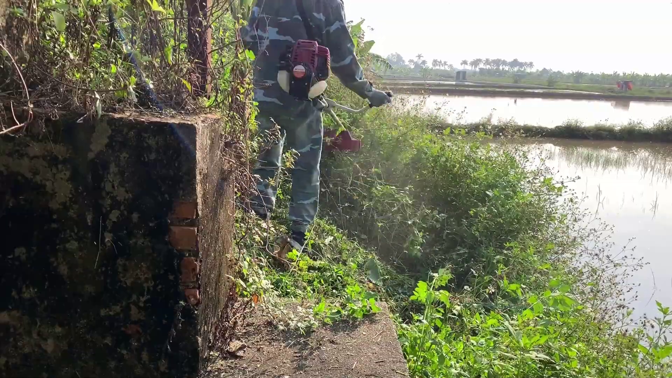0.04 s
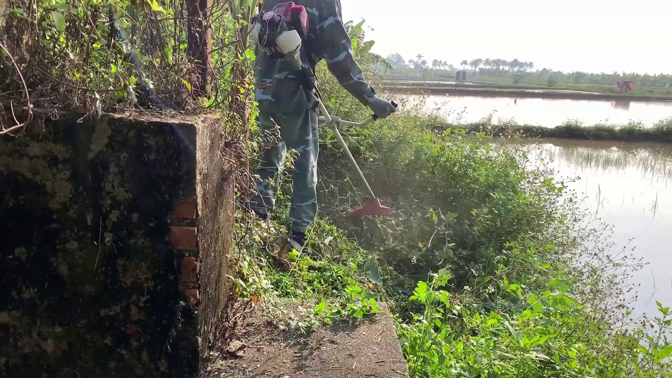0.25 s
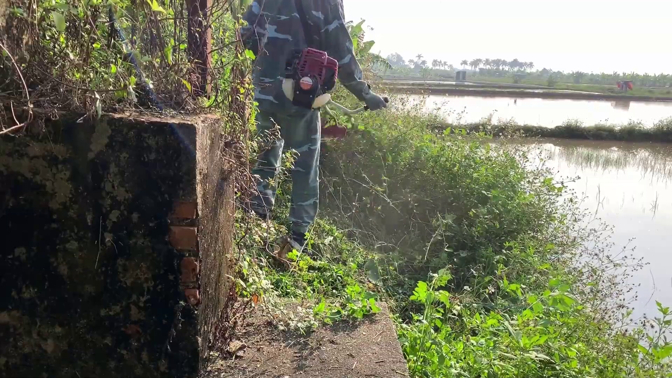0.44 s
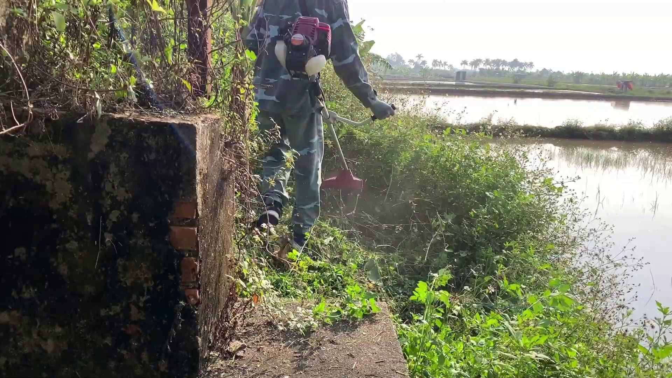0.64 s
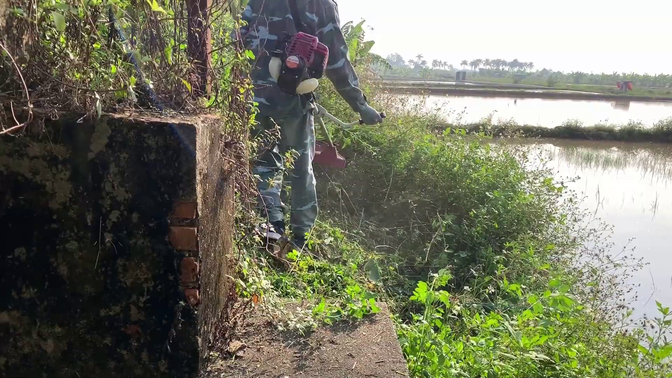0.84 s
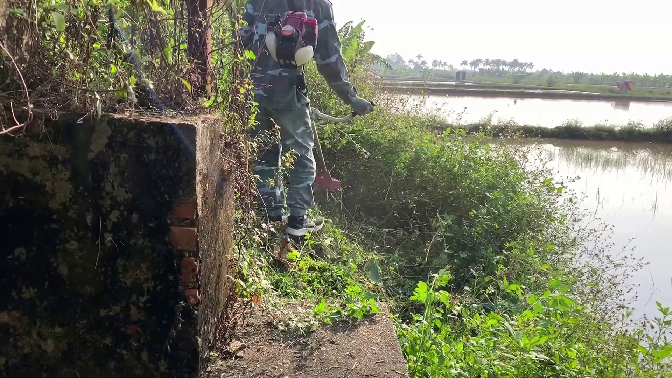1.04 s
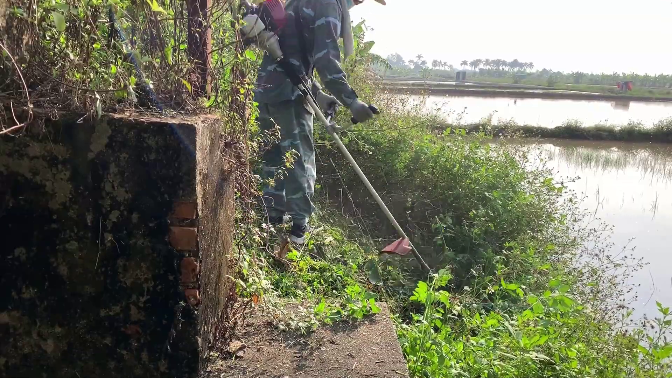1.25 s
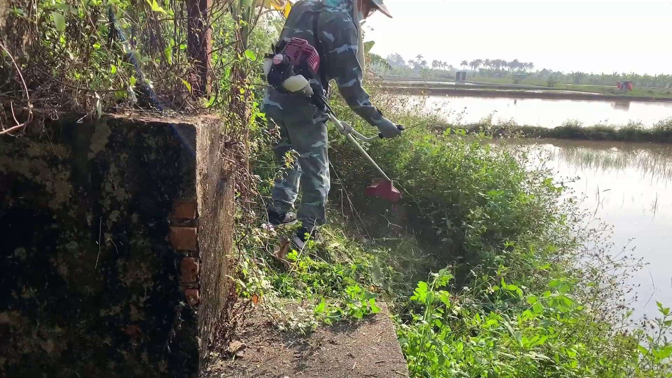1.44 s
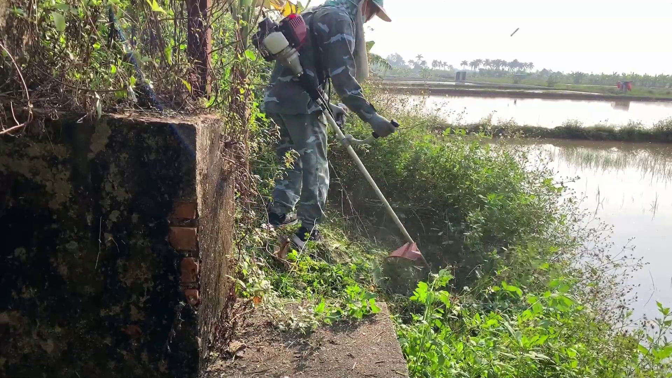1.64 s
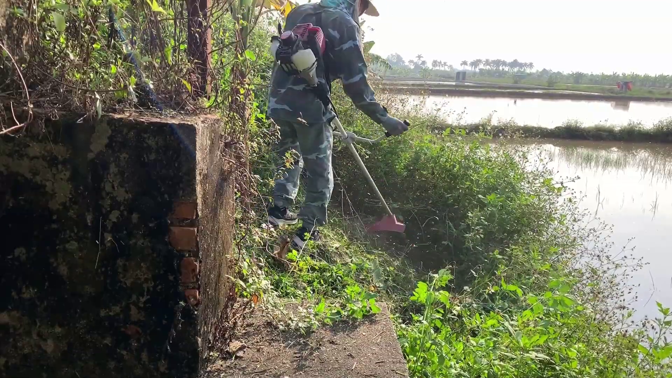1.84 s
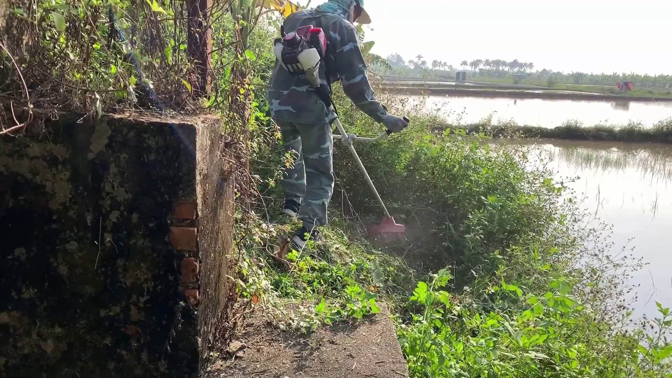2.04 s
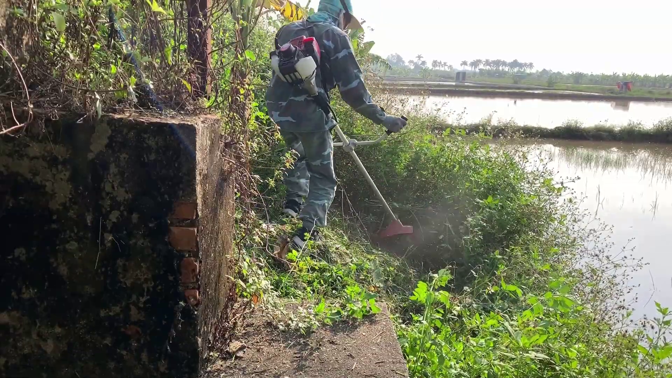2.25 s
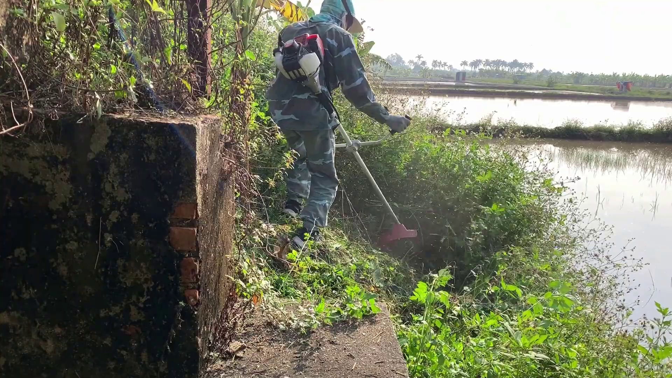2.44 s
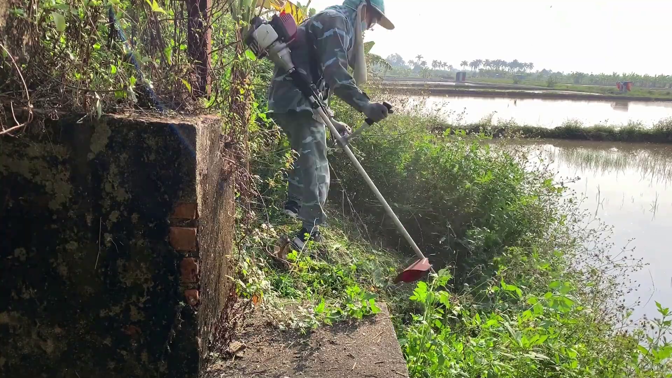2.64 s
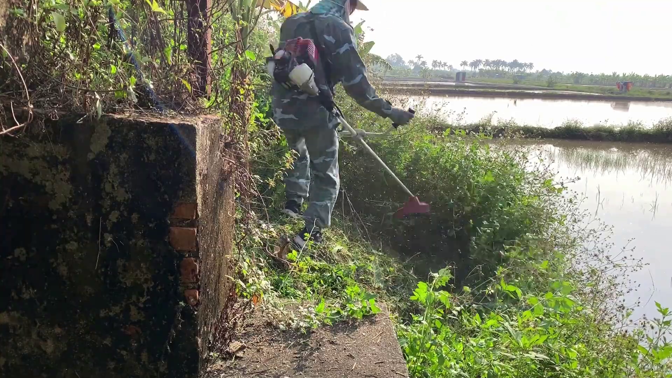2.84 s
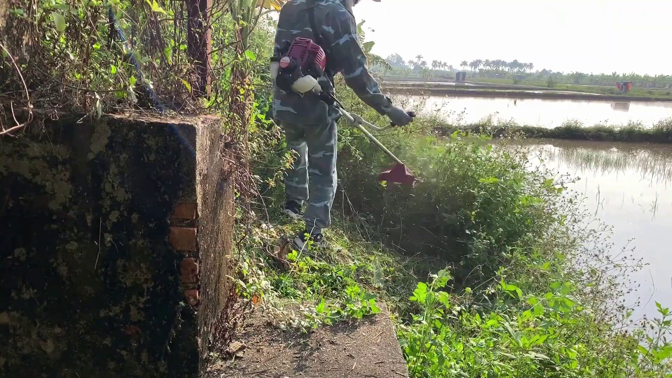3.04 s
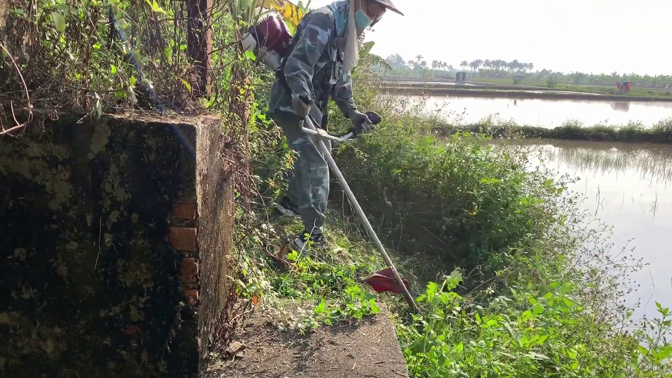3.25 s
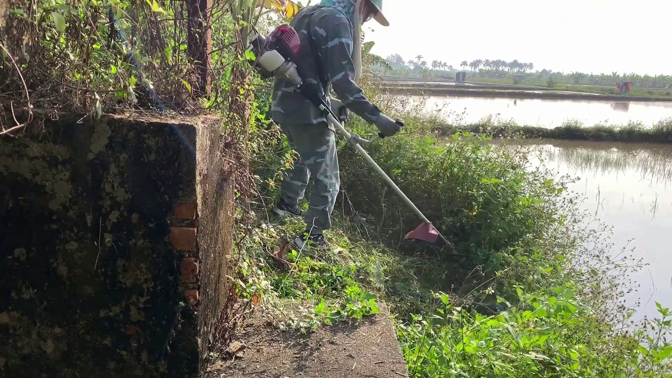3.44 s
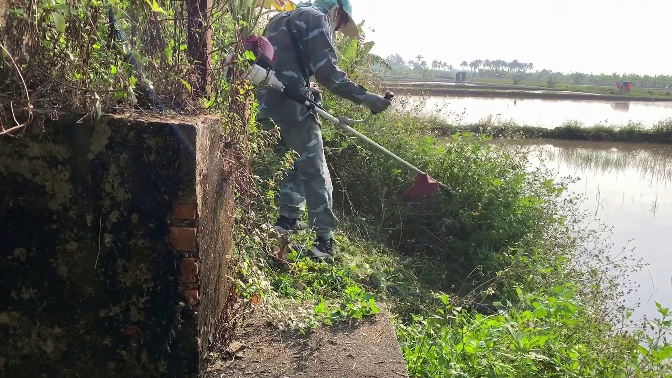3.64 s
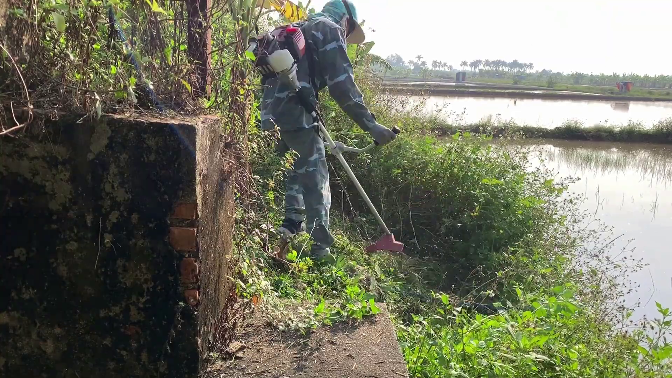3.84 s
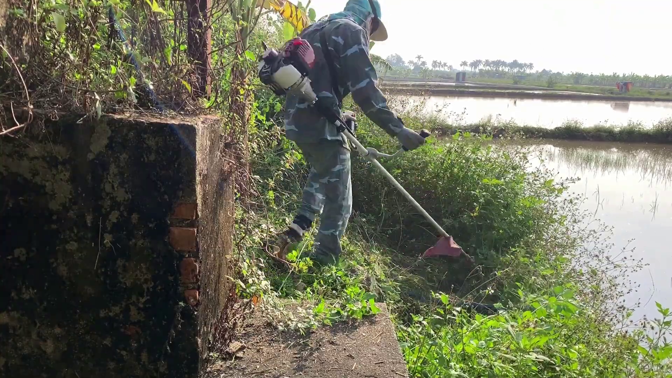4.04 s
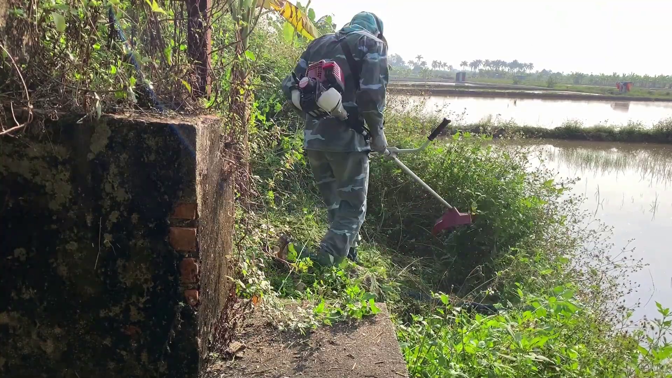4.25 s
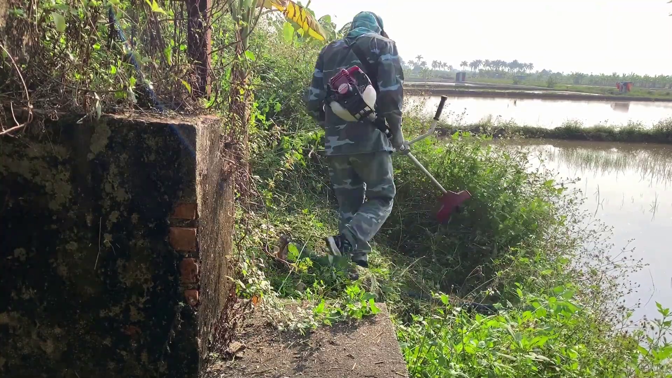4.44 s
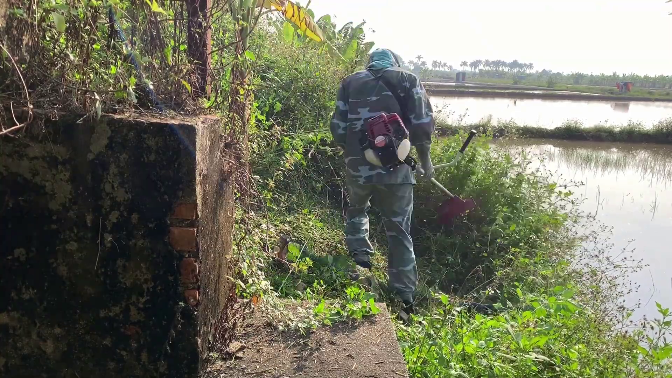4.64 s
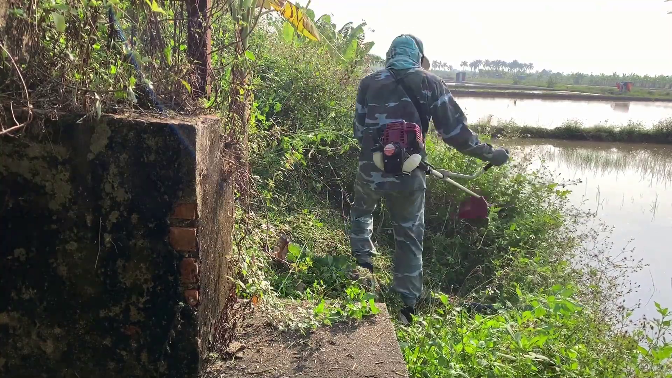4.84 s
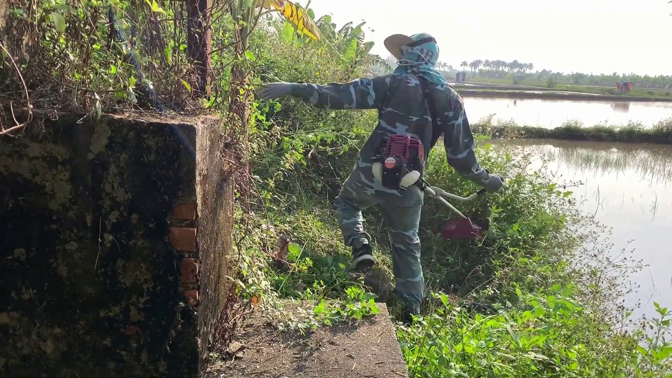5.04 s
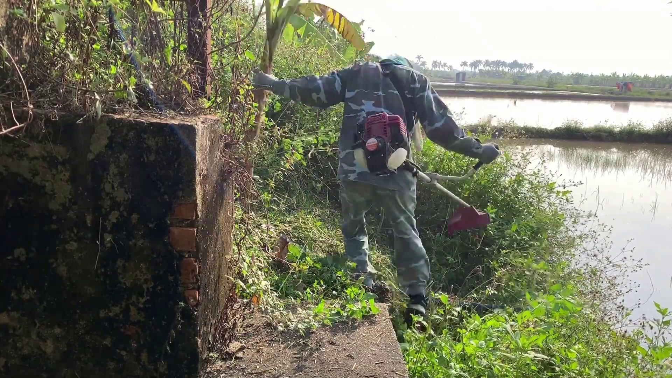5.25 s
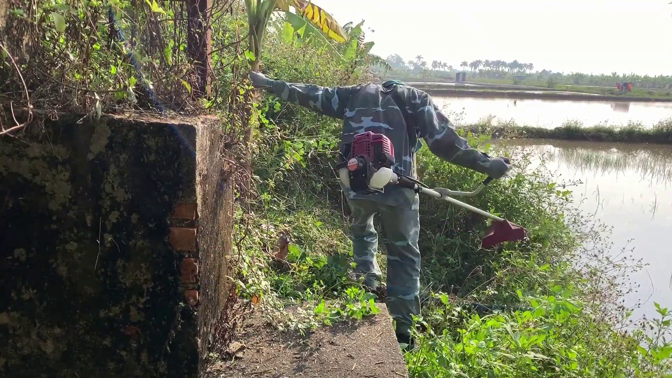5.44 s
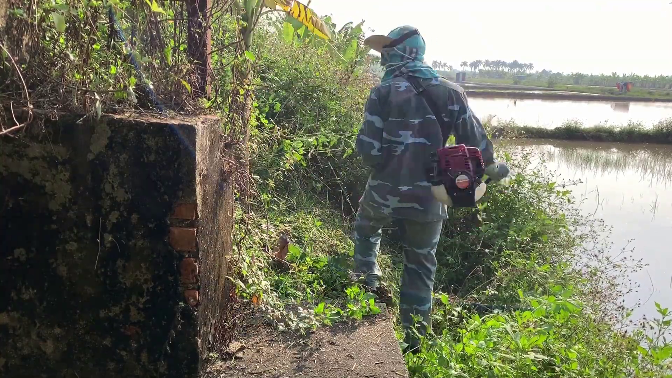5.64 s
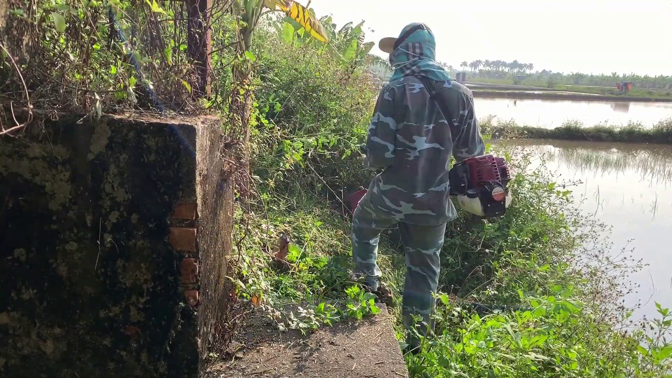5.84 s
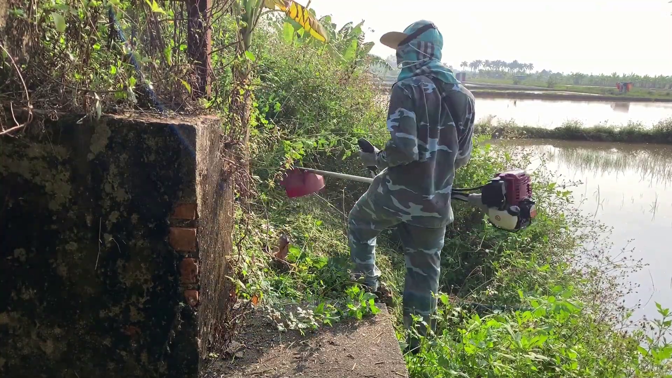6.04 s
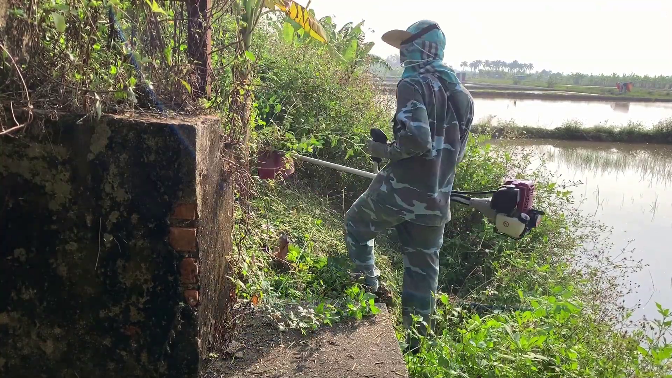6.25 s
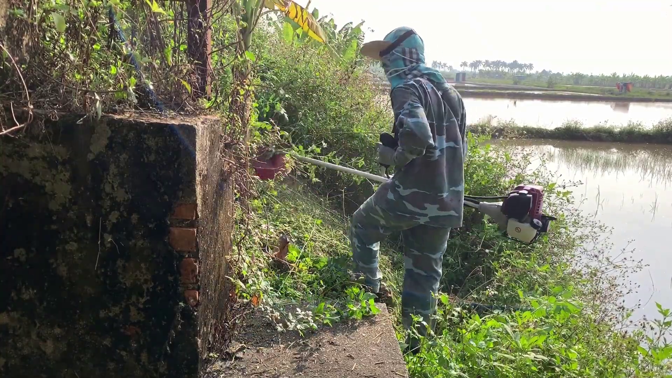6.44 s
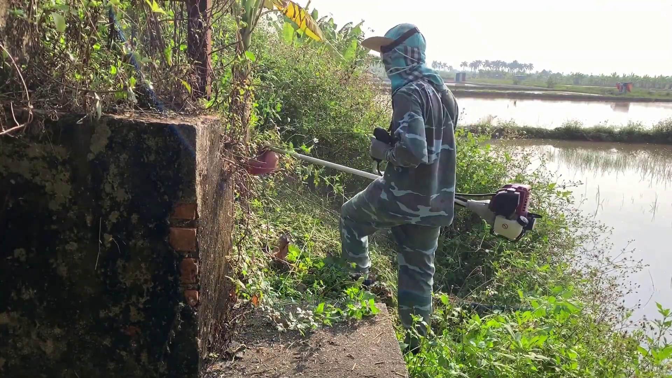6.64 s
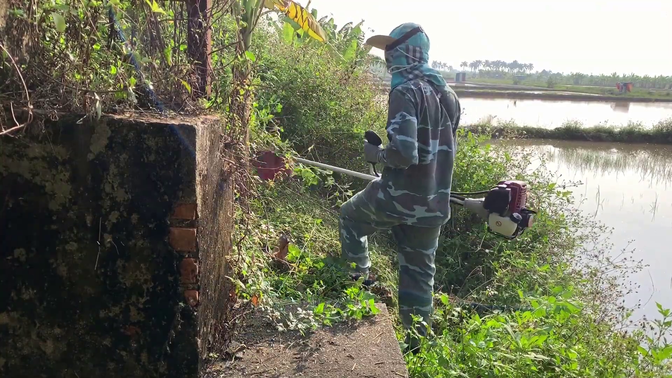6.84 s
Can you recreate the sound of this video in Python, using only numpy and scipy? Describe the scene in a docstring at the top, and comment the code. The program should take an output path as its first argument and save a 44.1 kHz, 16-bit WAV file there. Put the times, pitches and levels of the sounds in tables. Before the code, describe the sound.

In the open beside a weedy bank, a small two-stroke brush cutter is heard in stereo from a few metres away. From 0 to 4 seconds it runs at high revs, a dense, ringing buzz sagging in pitch and recovering as the head bites, especially near 0.2, 1.5, 2.5 and 3.0. Airy hiss, shredded leaves and crackling stems ride over it, with gear whine and chatter around 2.1 to 2.3 and 3.5. At about 4.1 the throttle shuts and the note falls quickly to a quieter, lower, uneven sputter, with small dry pops around 5.05 to 5.45. At 5.75 it opens abruptly, louder and closer, with a brief high rising squeak near 5.9 and gear chatter around 6.0. It climbs back to full revs and cuts on, sagging sharply near 6.6, until the end at about 6.9. Faint breeze buffets the microphones.

```python
"""A two-stroke backpack brush cutter works through weeds on a bank, a few metres away in the open.
Its exhaust is one ringing pulse per firing; the engine sags as the head bites, drops back, then opens up close by.
Each firing also puffs hiss; ragged ones ring the muffler or pop. Stems crackle in the rush of air and leaves.
The gear in the head whines in bursts and chatters, the head squeaks once, and a faint breeze buffets."""
import sys
import numpy as np
from scipy import signal
from scipy.fft import rfft, irfft, next_fast_len
from scipy.io import wavfile
from scipy.ndimage import uniform_filter1d

SR = 44100
rng = np.random.default_rng(int(sys.argv[2]) if len(sys.argv) > 2 else 0)


def digitize_waveform(pressure):
    """Quantize a signal to 16-bit integers and store it at the path in sys.argv[1].

    Rows of a 2-D input are taken as channels; values are limited to [-1, 1].
    """
    field = np.atleast_2d(pressure).T
    bounded = np.clip(field, -1, 1)
    quanta = np.round(bounded * 32767).astype(np.int16)
    wavfile.write(sys.argv[1], SR, quanta)


N = 304731
T = np.arange(N) / SR
FFT_SIZE = next_fast_len(N)
HZ = np.fft.rfftfreq(FFT_SIZE, 1 / SR)
CUTOFF_HZ = 15900
SHUT_S, OPEN_S = 4.1, 5.75  # the throttle is shut between these times

# Stereo width. Each row: frequency in Hz, side minus mid in dB.
WIDTH = [(60, -18), (300, -12), (700, -31), (1300, -7.5), (2400, -21.5), (4400, -7.5), (8100, -6),
         (15000, -5)]


def amp(db):
    """Decibels to gain."""
    return 10 ** (np.asarray(db) / 20)


def unit(x):
    """Scales to an rms of one."""
    return x / np.sqrt(np.mean(abs(x) ** 2) + 1e-20)


def follow(rows, t=T):
    """The columns of a curve table at the times t."""
    s, *columns = np.transpose(rows)
    return [np.interp(t, np.sort(s), column) for column in columns]


def read(points, hz):
    """A spectrum at the given frequencies, interpolated over log frequency."""
    f, value = np.transpose(points)
    return np.interp(np.log(hz + 1), np.log(f + 1), value)


def colour(x, gain):
    """Filters by one gain per frequency."""
    return irfft(rfft(x, FFT_SIZE) * gain, FFT_SIZE)[..., :N]


def drift(rate_hz):
    """Smooth chance of unit rms, rolled off around the rate."""
    return unit(colour(rng.standard_normal(N), np.exp(-(HZ / rate_hz) ** 2)))


def wander(z, firings):
    """Smooths chance values over about so many firings."""
    lag = np.arange(-200, 201)[:, None]
    return unit(signal.fftconvolve(z, np.exp(-(lag / firings) ** 2), "same", axes=0))


def widen(mid, side):
    """Left and right from direct sound and sound scattered by the surroundings."""
    side = colour(side, amp(read(WIDTH, HZ)))
    return np.array([mid + side, mid - side])


def running(t, changes, fade=0.037):
    """Shares of the stretches between the changes, fading into one another over so many seconds."""
    passed = [np.clip((t - s) / fade + .5, 0, 1) for s in changes]
    return -np.diff([np.ones(len(t)), *passed, np.zeros(len(t))], axis=0)


def swell(t, s, before, after, shape=2):
    """Rises to one at the time s and falls away again."""
    return np.exp(-(abs(t - s) / np.where(t < s, before, after)) ** shape)


def bursts(rows):
    """The envelope of rows of time in s, half length in s, level in dB."""
    return sum(amp(db) * swell(T, s, half, half) for s, half, db in rows)


def lift_db(rows):
    """The brief level changes in rows of time in s, half length in s, change in dB."""
    return sum(db * swell(T, s, half, half) for s, half, db in rows)


def coasting(t):
    """One while the throttle is shut."""
    return running(t, [SHUT_S, OPEN_S], fade=.021)[1]


def sag(t):
    """Speed lost as the head bites into weeds, in firings per second."""
    # Each row: time when slowest in s, sag in Hz, build-up in s, recovery in s.
    bites = [(0.032, 28.7, 0.14, 0.05), (0.198, 32.5, 0.052, 0.22), (0.359, 9.9, 0.13, 0.14),
             (0.632, 16.4, 0.028, 0.074), (0.787, 24.8, 0.062, 0.1), (1.315, 19.2, 0.21, 0.11),
             (1.473, 35, 0.059, 0.088), (1.64, 17.5, 0.072, 0.084), (1.765, 22.3, 0.063, 0.071),
             (1.962, 16.3, 0.15, 0.074), (2.106, 16.7, 0.06, 0.29), (2.538, 34.5, 0.34, 0.26),
             (2.729, 12, 0.112, 0.037), (2.892, 27, 0.11, 0.044), (2.984, 43.5, 0.053, 0.094),
             (3.353, 20.6, 0.14, 0.28), (3.94, 27.1, 0.11, 0.45), (6.198, 9.7, 0.14, 0.054),
             (6.627, 48.8, 0.059, 0.11)]
    shape = 1.5  # between pointed (1) and rounded (2)
    return sum(hz * swell(t, s, build, recovery, shape) for s, hz, build, recovery in bites)


def crank_speed(t):
    """Firings per second: what the throttle gives less what the weeds take."""
    # Head running free. Each row: time in s, firings per second.
    free_speed = [(-0.0, 347.6), (4.042, 350.8), (4.11, 289.5), (4.217, 236.8), (4.425, 200.6),
                  (4.659, 191.7), (4.77, 207.7), (5.08, 208.3), (5.1, 205.3), (5.23, 205.1), (5.286, 209.5),
                  (5.37, 203), (5.424, 209), (5.468, 202.7), (5.586, 206.6), (5.738, 204.8), (5.76, 273.4),
                  (5.925, 279.0), (6.022, 333.6), (6.359, 354.8), (6.7, 349.7), (6.9, 362.4)]
    return follow(free_speed, t)[0] - sag(t)


def breeze(level_db=-1, corner_hz=45, buffet_db=4, buffet_hz=8):
    """Wind on the microphone: faint low noise, buffeting at random, with a few gusts."""
    # Steady breeze. Each row: time in s, level in dB before the trim level_db.
    steady_levels = [(0, -99), (1.4, -103), (3.9, -106), (4.2, -119), (5.6, -110), (5.85, -94), (6.1, -101),
                     (6.91, -103)]
    # Each row: time in s, half length in s, level in dB.
    gusts = [(.52, 0.03, -88), (.87, 0.029, -89), (1.285, 0.013, -82), (5.8, 0.039, -91),
             (5.965, 0.026, -81), (6.39, 0.024, -91)]
    rumble = unit(colour(rng.standard_normal((2, N)), 1 / (1 + (HZ / corner_hz) ** 2)))
    steady = amp(follow(steady_levels)[0] + level_db + buffet_db * drift(buffet_hz))
    return widen(*rumble) * (steady + bursts(gusts))


def surroundings(x, fade_s=0.037):
    """Reflections from wall, bank and body cancel or lift narrow bands for a while."""
    # Each row: start in s, end in s, centre in Hz, width in Hz, gain in dB.
    reflections = [(0.181, 0.36, 1940, 350.5, -18), (0.448, 0.619, 3900, 700, -9),
                   (1.3, 2.1, 3650, 349.7, -5), (2.25, 2.95, 1970, 299.4, -3),
                   (3.101, 3.851, 1170, 160, -2), (3.265, 3.5, 3940, 900, 2.5),
                   (4.126, 4.68, 1170, 200, 4.5), (4.2, 4.68, 3670, 600, -5), (4.7, 5.727, 5400, 500, -8),
                   (4.7, 5.721, 3429, 200, -13), (5.33, 5.68, 10900, 350, 4),
                   (6.1, 6.951, 6520, 499.6, -15), (6.098, 6.95, 3220, 350, -8),
                   (6.569, 6.715, 3434, 998, -2)]
    for start, end, hz, width, db in reflections:
        band = signal.lfilter(*signal.iirpeak(hz, hz / width, fs=SR), x)
        x = x + (amp(db) - 1) * running(T, [start, end], fade=fade_s)[1] * band
    return x


def squeak(turns, level_db=-2, undertone_db=-9):
    """The head scrapes: a short rising squeak with a rasp an octave below, shaken once a turn."""
    # Each row: time in s, pitch in Hz, level in dB before the trim level_db.
    glide = [(5.862, 9580, -40), (5.869, 9860, -28), (5.877, 11000, -30), (5.882, 12270, -29),
             (5.889, 11940, -28), (5.898, 12790, -42)]
    hz, db = follow(glide)
    sounding = (T > glide[0][0]) & (T < glide[-1][0])
    phase = 2 * np.pi * np.cumsum(hz) / SR + 0.87 * drift(590)
    tone = np.sin(phase) + amp(undertone_db) * np.sin(phase / 2 + drift(694))
    return sounding * amp(db + level_db) * tone * (1 + 1.16 * np.cos(2 * np.pi * turns))


def grab():
    """How hard the weeds are braking the head, from -1 (spinning up) to 1."""
    smoothing_s, hard_braking_hz_per_s = 0.02, 390
    braking = uniform_filter1d(np.gradient(sag(T), T), int(smoothing_s * SR))
    return np.tanh(braking / hard_braking_hz_per_s)


def gear(turns, bursts_hz=88, unevenness=0.41, burst_s=0.0025, spread_db=1.5, level_db=1.0,
         chatter_db=-3, runout_depth=0.088, lobes_depth=0.37, unload_s=0.052, wobble=1.8,
         grab_db=5.5, coasting_db=-17.5):
    """Teeth mesh at thirty times crank speed; the shaft winds up and lets go, so the whine comes in bursts."""
    # Whine. Each row: time in s, level in dB before the trim level_db.
    whine_levels = [(0.0, -48), (2.26, -45), (3.85, -51.5), (3.96, -40), (4.18, -41), (5.69, -65.5),
                    (6.02, -41), (6.38, -59), (6.9, -45)]
    # Brief swells and drops. Each row: time in s, half length in s, change in dB.
    swells = [(.22, 0.046, 8.5), (.34, 0.026, 11), (1.28, 0.023, 4.5), (1.37, 0.032, -18), (1.53, 0.14, 4),
              (5.945, .025, 7), (6.17, 0.039, 9)]
    # Hardest bursts. Each row: time in s, peak in dB before the trim chatter_db.
    chatter = [(2.121, -30), (2.142, -31), (2.171, -30.5), (2.2016, -45), (2.248, -30.5), (2.256, -33),
               (2.27, -30), (2.28, -28), (2.2918, -32), (2.3043, -36), (3.4536, -34), (3.4678, -43),
               (3.494, -40), (3.5085, -35), (3.524, -35), (5.961, -27), (5.9836, -29), (6.0253, -27),
               (6.0339, -22), (6.0416, -22), (6.053, -27)]
    shaft = np.cumsum(bursts_hz * (1 + unevenness * drift(70))) / SR
    sizes = amp(spread_db * np.clip(rng.standard_normal(N), -2, 1.5))
    kicks = np.diff(np.floor(shaft), prepend=0) * sizes
    bell = np.exp(-(np.arange(-400, 401) / SR / burst_s) ** 2)
    level = unit(.15 + unit(signal.oaconvolve(kicks, bell, "same")))
    hard = np.zeros(N)
    for s, db in chatter:
        hard[round(s * SR)] = amp(db + chatter_db)
    whine_db = follow(whine_levels)[0] + level_db + grab_db * grab() + lift_db(swells)
    level = np.maximum(level * amp(whine_db), signal.oaconvolve(hard, bell, "same"))
    level = level * amp(coasting_db * coasting(T + unload_s))  # coasting teeth carry little load
    # uneven tooth load, once and three times a turn, puts sidebands around the whine
    load = 1 + runout_depth * np.cos(2 * np.pi * turns) + lobes_depth * np.cos(6 * np.pi * turns)
    load = load + .25 * drift(1100)
    phase = 2 * np.pi * 30 * turns + wobble * drift(97)
    ears = np.array([np.cos(phase + .35 * drift(40)) for ear in range(2)])
    return level * load * np.sqrt(2) * ears


def bounce(x, delay_s=0.000632, sway=0.098, strength=0.28):
    """A close reflection whose path changes with the swing: slowly moving peaks and dips in the treble."""
    late = T - delay_s * (1 + sway * drift(1.62))
    return (x + strength * np.array([np.interp(late, T, ear) for ear in x])) / np.hypot(1, strength)


def hiss(turns, open_puff=0.96, puff_turns=0.33, stray_turns=0.089, crackle=0.41, stems_per_s=900,
         grain_db=1.0, rush_db=0.9, fizz_db=-1.5, spit_turns=0.086, spit_spread_db=0.2):
    """Gas bursts from the port once a turn, over the rush of the head and the snapping of stems."""
    # Air and leaves. Each row: time in s, rush below and fizz above 10 kHz in dB before trims.
    levels = [(0, -49.5, -38.5), (1.38, -52, -44), (2.35, -51.5, -40), (2.7, -55, -46), (3.8, -54, -44.5),
              (3.98, -49, -40.5), (4.13, -52.5, -48.5), (4.7, -54.5, -49.5), (5.74, -46.5, -44.5),
              (5.9, -45, -30.5), (6.2, -50.5, -40.5), (6.9, -51.5, -43.5)]
    # Colour with the throttle open. Each row: frequency in Hz, relative level in dB.
    open_colour = [(100, -45), (190, -37), (270, -17), (520, -15), (850, -25), (1200, -21), (1550, -13),
                   (2000, -29), (2700, -8), (3600, -9.5), (4500, -5.5), (5200, -1.5), (6000, -3.5),
                   (7300, -1.5), (10500, 5), (12500, 3.5), (15700, 2)]
    # Colour with the throttle shut. Each row: frequency in Hz, relative level in dB.
    shut_colour = [(130, -49), (240, -18), (900, -10.5), (2600, -12.5), (3500, -13.5), (4400, -6),
                   (5000, -7.5), (5800, -10), (6150, -4.5), (6500, -6), (7300, -2.5), (7750, -2),
                   (8150, -4), (8800, 0.5), (10200, 0.5), (11100, 4.5), (12000, 4.5), (13000, 7.5),
                   (14300, 2.5), (15300, 5), (15700, 5)]
    # Coasting puffs, growing as the engine picks up again. Each row: time in s, depth.
    spit_depth = [(4.2, 1.55), (4.9, 2.65)]
    # Sprays of shredded leaves. Each row: time in s, half length in s, lift in dB.
    sprays = [(1.021, 0.026, 4.5), (1.549, 0.048, 1), (2.339, 0.036, 3), (3.025, 0.16, 4)]
    shut = coasting(T)
    # turbulence shifts each puff a little
    puff = np.exp(-((turns + stray_turns * drift(200)) % 1) / puff_turns)
    # no two coasting firings spit alike
    sizes = amp(spit_spread_db * np.clip(rng.standard_normal(N), -2, 2))
    spit = sizes[turns.astype(int)] * np.exp(-(turns % 1) / spit_turns)
    snap_sizes = amp(grain_db * np.minimum(rng.exponential(1, (2, N)), 5))
    snaps = (rng.random((2, N)) < stems_per_s / SR) * snap_sizes
    snaps = signal.lfilter([1], [1, -np.exp(-1 / (0.00073 * SR))], snaps)
    air = bounce(rng.standard_normal((2, N)))
    open_gate = 1 + open_puff * puff + crackle * unit(snaps)
    shut_gate = 1 + follow(spit_depth)[0] * spit
    noise = 0
    for share, gate, spectrum in ((1 - shut, open_gate, open_colour), (shut, shut_gate, shut_colour)):
        noise = noise + share * unit(colour(air * gate, amp(read(spectrum, HZ)) * (HZ < CUTOFF_HZ)))
    noise = widen(*noise) * amp(1.36 * drift(18))  # the hiss flickers
    noise = noise * amp(lift_db(sprays))
    high = 1 / (1 + (10000 / (HZ + 1)) ** 8)
    rush, fizz = follow(levels)
    low_part = colour(noise, 1 - high) * amp(rush + rush_db + 11.5)
    return low_part + colour(noise, high) * amp(fizz + fizz_db + 2.0)


def misfires(ring_s=0.0022, low_hz=550, high_hz=3000):
    """A late charge goes off in the muffler: one short, dry pop out of the idle."""
    # Each row: time in s, peak in dB.
    late_firings = [(4.327, -47), (5.055, -31), (5.225, -34), (5.26, -42), (5.45, -33)]
    resonator = signal.butter(4, [low_hz, high_hz], "bandpass", fs=SR, output="sos")
    t = np.arange(1000) / SR
    out = np.zeros(N)
    for s, db in late_firings:
        pop = signal.sosfilt(resonator, rng.standard_normal(len(t)) * np.exp(-t / ring_s))
        out[round(s * SR):][:len(t)] += amp(db) * pop / abs(pop).max()
    return out


def sputter(turns, stray_turns=.17, spread_db=4.0, edge_s=0.017):
    """Half-burnt firings, uneven in size and timing, each ring a resonance of the muffler or of the engine
    casing."""
    # Throttle shutting, idling, opening. Each row: start in s, end in s, resonance in Hz, width in Hz, level in dB.
    resonances = [(4.05, 4.117, 810, 240, -52.5), (4.065, 4.118, 1430, 840, -50.5),
                  (4.055, 4.21, 2430, 550, -55), (4.16, 4.225, 1250, 1000, -56),
                  (4.1, 4.66, 7300, 340, -53.5), (4.75, 5, 4200, 170, -62), (4.8, 6.1, 2700, 990, -58.5),
                  (5.738, 5.775, 1520, 1700, -39), (4.1, 4.1, 5300, 810, -68)]
    fired = np.diff(np.floor(np.maximum.accumulate(turns + stray_turns * drift(120))), prepend=0)
    pops = fired * amp(spread_db * np.clip(rng.standard_normal(N), -2, 2))
    out = 0
    for start, end, hz, width, db in resonances:
        edges = [max(hz - width / 2, hz / 10), hz + width / 2]
        resonator = signal.butter(2, edges, "bandpass", fs=SR, output="sos")
        ring = unit(signal.sosfilt(resonator, pops))
        out = out + amp(db) * running(T, [start, end], fade=edge_s)[1] * ring
    return out


def exhaust_levels(t):
    """Boom, bark, ring and rasp in dB, from position, drag and swings."""
    # The operator moves about. Each row: time in s, boom, bark, ring, rasp in dB before trims.
    position = [(0.0, -42.5, -40.5, -46, -46), (0.8, -39.5, -44.0, -51, -44.5), (0.9, -38, -50, -48, -47),
                (1.37, -43.5, -47, -47.5, -47), (2.06, -44.5, -44.5, -44, -48.5),
                (2.11, -50, -44, -42.5, -47), (2.83, -45.5, -48, -46.5, -50),
                (2.98, -45.5, -44.5, -47, -50.5), (3.34, -49, -53, -49, -51), (3.79, -42, -46, -52.5, -52),
                (3.97, -48, -46.5, -41.5, -43.5), (4.045, -49.5, -51, -47, -52), (4.06, -54, -53, -54, -66),
                (4.19, -66, -54.5, -55.5, -62), (4.5, -61.5, -51, -56, -65), (5.735, -50, -40, -41, -51),
                (5.77, -39, -37.5, -32, -39), (5.99, -38, -34, -37.5, -40), (6.17, -43, -46.5, -42, -43),
                (6.9, -50.5, -45, -44.5, -44)]
    # The muffler swings about. Each row: time in s, half length in s, boom, bark, ring change in dB.
    swings = [(0.107, 0.028, 5, -9, 0), (0.364, 0.048, -5.5, -1.5, -0.5), (0.537, 0.06, 1.5, -4.5, 3),
              (0.653, 0.045, 0, 2.5, -3), (0.783, 0.027, -8, 0.5, 3), (1.331, 0.072, -5, 2.5, 1.5),
              (1.463, 0.094, -2, -0.5, 5.5), (1.58, 0.024, 2.5, 2, 2), (1.689, 0.078, -7, -1, 3),
              (2.141, 0.041, -1.5, -9, -3.5), (2.252, 0.031, -0.5, -7, -2), (2.425, 0.11, -2.5, -3.5, -3.5),
              (2.788, 0.075, -8.5, -3.5, 1), (3.135, 0.057, 4, 0.5, 0), (3.33, 0.056, -3, 1, -2.5),
              (3.503, 0.061, 0.5, 1.5, 5.5), (4.576, 0.069, 0, -3.5, -6), (5.667, 0.039, 2.5, 1.5, -4.5),
              (6.373, 0.11, -2.5, 4, -1), (6.622, 0.05, -2.5, -0.5, -2), (6.761, 0.039, 6, 0, 0.5),
              (6.868, 0.063, 3.5, 5, -3)]
    boom, bark, ring, rasp = follow(position, t)
    drag = sag(t) - 25.5  # Hz beyond the sag of ordinary mowing
    swung = sum(np.outer(dbs, swell(t, s, half, half)) for s, half, *dbs in swings)
    return np.array([boom + swung[0] - 0.09 * drag,  # a dragged engine falls off the muffler's tuning
                     bark + swung[1],
                     ring + swung[2],
                     rasp - 0.2 * drag])  # and loses some of its edge


def postures():
    """How the engine faces the listener and runs as the operator swings: start in s, pulse shape."""
    # Every table: relative level in dB of crank orders 1, 2, 3 ..
    behind = [-10.5, 0.5, -14, -10, 2, -17.5, -16, -18.5, -19, -19, -12.5, -22, -18.5, -8, -14.5, -12, -17,
              -23]  # heard from behind the operator
    reaching = [-9, 1.5, -20.5, -27.5, -11, -16, -8.5, -7, -13.5, -22, -19, -24, -27, -15, -23, -16, -32,
                -28.5]  # out to the right
    turned = [-11, -1, -12, -10.5, 2, -9, -4, -1.5, -7.5, -8.5, -13.5, -7.5, -13, -17, -15.5, -7.5, -21.5]  # muffler turned away
    bent = [-9.5, -0.5, -12, -5, 4, -21, -8.5, -2.5, -7, -5, -12, -1.5, -18, -19, -21, -1, -17]  # low over the weeds
    rundown = [-25, -13, -10, -2.5, 2.5, -1, -9.5, 2, -3.5, -10, -12, -7, -17, -16, -11, -37, -14, -24, -22,
               -20, -14, -12]  # after the throttle is let go
    coasting_shape = [-23, -14, -5.5, 0.5, 3.5, -2, -7, -1, 0, -9, -3.5, -3, -14, -9, -11, -39, -17, -22,
                      -28, -19.5, -9, -13, -21, -14]  # throttle shut
    opening = [-13, -9.5, -7.5, -7.5, 6.5, -1.5, 4, -1.5, 1.5, -24, -48, -9, -12, -9, -8, -18, -30, -23,
               -17, -14, -22]  # pulling hard as the throttle opens
    side_on = [-5.5, -0.5, -11, -5, 3.5, 3, -7.5, -6, -14, -17, -11, -7, -30, -17.5, -14, -9.5, -20, -18.5]  # side-on and close
    return [(0, behind), (0.84, reaching), (1.27, turned), (2.11, bent), (3.03, reaching),
            (3.27, turned), (3.53, reaching), (3.89, turned), (SHUT_S, rundown),
            (4.7, coasting_shape), (OPEN_S, opening), (6.02, side_on)]


def pulse(db, smear_turns, lag_turns, lag_below, count=26, fall_db=0.67):
    """Harmonics of a pulse that rings down; the muffler delays the low pop and spreads the upper partials."""
    k = np.arange(len(db)) + 1
    every = np.arange(2 * count + 1)
    log_gain = np.log(amp(np.interp(every, k, db) - fall_db * np.maximum(every - k[-1], 0)))
    # minimum phase from the log spectrum
    circle = np.concatenate([log_gain, log_gain[-2:0:-1]])
    harmonics = np.exp(signal.hilbert(circle).conj())[1:count + 1]
    order = np.arange(count)
    delay = smear_turns * order / len(k) + lag_turns / (1 + (order / lag_below) ** 10)
    return harmonics * np.exp(-2j * np.pi * np.cumsum(delay))


def exhaust(turns, trim_db=(.5, .3, -.7, -4), scatter=1.0, rasp_scatter=0.064, shut_scatter=0.31,
            fading=0.56, flutter=0.27, side_db=2, open_smear=0.873, shut_smear=0.034, lag_turns=0.327,
            open_lag_below=8.26, shut_lag_turns=0.269, shut_lag_below=5.94, ring_scatter=0.052,
            shut_calm=0.44):
    """One pulse a turn, each a little different; echoes off wall and bank shift as the operator moves."""
    # Edges in Hz between boom, bark, ring and rasp.
    edges_hz = [780, 2150, 3400]
    # Uneven combustion. Each row: time in s, relative spread of strength between firings.
    roughness = [(0.2, 0.037), (1.2, 0.047), (3.9, 0.025), (4.03, 0.068), (4.07, 0.2), (4.14, 0.086),
                 (4.5, 0.18), (5.3, .14), (5.71, 0.15), (5.748, 0.33), (5.78, 0.16), (5.97, 0.15),
                 (6.1, 0.038), (6.52, 0.049), (6.62, 0.13), (6.75, 0.057)]
    firing = np.arange(int(turns[-1]) + 2)
    t = np.interp(firing, turns, T)
    shut = coasting(t)[:, None]
    starts, ways = zip(*postures())
    shapes = np.array([pulse(way, shut_smear, shut_lag_turns, shut_lag_below) if SHUT_S <= s < OPEN_S
                       else pulse(way, open_smear, lag_turns, open_lag_below)
                       for s, way in zip(starts, ways)])
    shares = running(t, starts[1:]).T
    angles = np.angle(shares @ (shapes / abs(shapes)))
    partials = (shares @ abs(shapes)) * np.exp(1j * angles)
    orders = np.arange(partials.shape[1]) + 1
    hz = crank_speed(t)[:, None] * orders
    chance = rng.standard_normal((4, *hz.shape)) + 1j * rng.standard_normal((4, *hz.shape))

    short = np.minimum(hz / 2500, 2)  # short waves fade and flutter most
    unsteady = short * (1 - shut_calm * shut)  # less so while the head is not being swung
    partials = partials * (1 + fading * unsteady * wander(chance[0], firings=19.4))

    above = [1 / (1 + (edge / hz) ** 24) for edge in edges_hz]
    bands = -np.diff([np.ones(hz.shape), *above, np.zeros(hz.shape)], axis=0)
    power = (bands * abs(partials) ** 2).sum(2)
    gains = amp(exhaust_levels(t) + np.array(trim_db)[:, None]) / np.sqrt(power / 2)
    partials = partials * (bands * gains[:, :, None]).sum(0)

    strength = rng.standard_normal((len(t), 1)) + scatter * chance[1]
    strength = strength * np.minimum(hz / 650, 1) ** 2  # the muffler evens out the bass
    rough = follow(roughness, t)[0][:, None] * (1 + bands[3])
    # the rasp is partly turbulence, most of all when coasting
    rough = rough + (rasp_scatter + shut_scatter * shut) * bands[3]
    rough = rough + ring_scatter * (1 - shut) * bands[2]
    partials = partials * (1 + rough * strength + flutter * unsteady * wander(chance[2], firings=2.66))

    side = wander(chance[3], firings=33) * amp(read(WIDTH, hz) + side_db) * np.minimum(short, 1)
    out, crank, wave = np.zeros((2, N)), np.exp(2j * np.pi * turns), 1
    for k in range(len(orders)):
        wave = wave * crank
        for ear, sign in enumerate((1, -1)):
            partial = partials[:, k] * (1 + sign * side[:, k])
            out[ear] += (np.interp(turns, firing, partial) * wave).real
    return out


def scene(hunting=.004, jitter=0.00354, shut_jitter=.005):
    """One crank drives all; it is less even when coasting, and the heavy head does not follow that jitter."""
    speed = crank_speed(T) * (1 + hunting * drift(21.47))
    head = np.cumsum(speed) / SR
    uneven = 1 + jitter * drift(139.0) + shut_jitter * coasting(T) * drift(50)
    turns = np.cumsum(speed * uneven) / SR
    engine = exhaust(turns) + sputter(turns) + misfires() + hiss(turns)
    return surroundings(engine + gear(head) + squeak(turns)) + breeze()


def record(dry):
    """The balance of the two microphones, then the band limit."""
    # Each row: frequency in Hz, left minus right in dB.
    lean = [(60, -1), (200, 2.5), (380, 3.5), (700, 3), (1300, 0.7), (4400, 0), (8100, -0.7), (15000, -.3)]
    heard = colour(dry, amp(np.array([[.5], [-.5]]) * read(lean, HZ)))
    lowpass = signal.firwin(511, CUTOFF_HZ, window=("kaiser", 9), fs=SR)
    return signal.oaconvolve(heard, lowpass[None], "same")


dry = scene()
out = record(dry)
digitize_waveform(out)
```